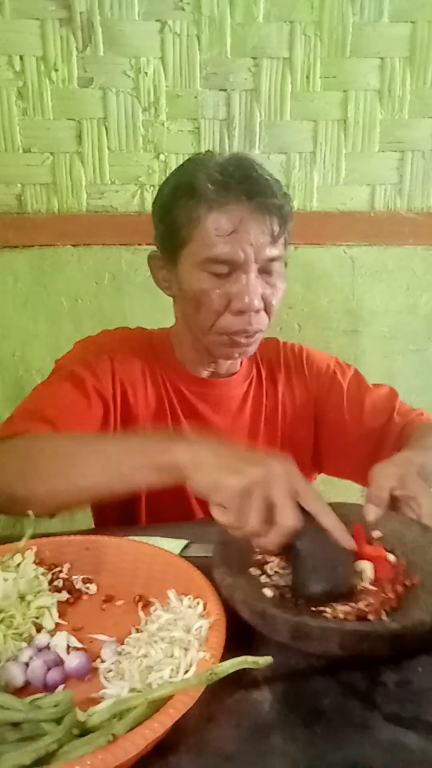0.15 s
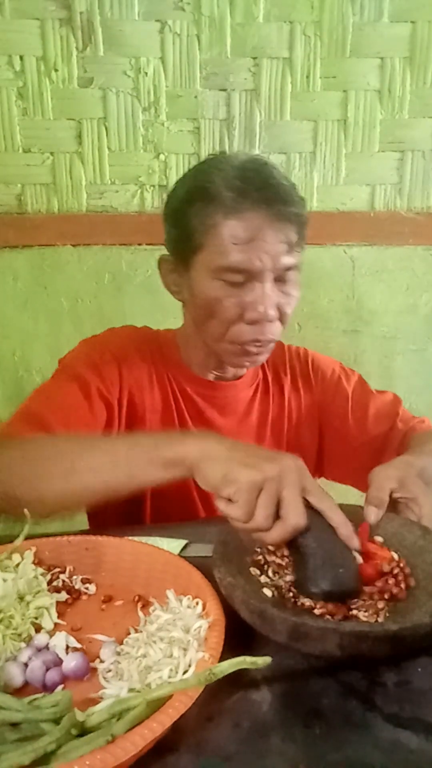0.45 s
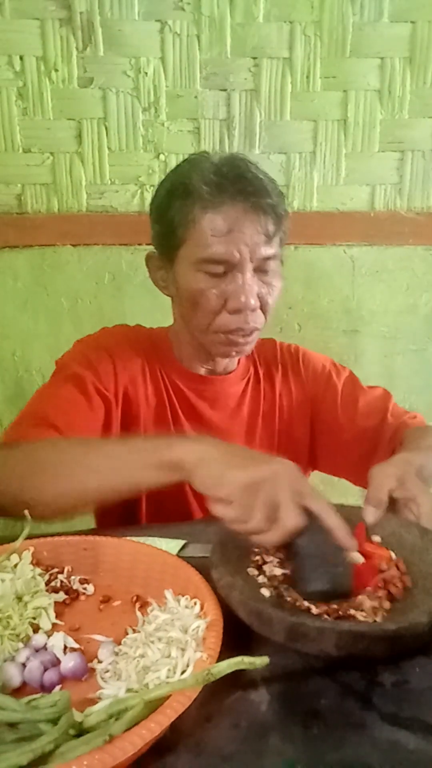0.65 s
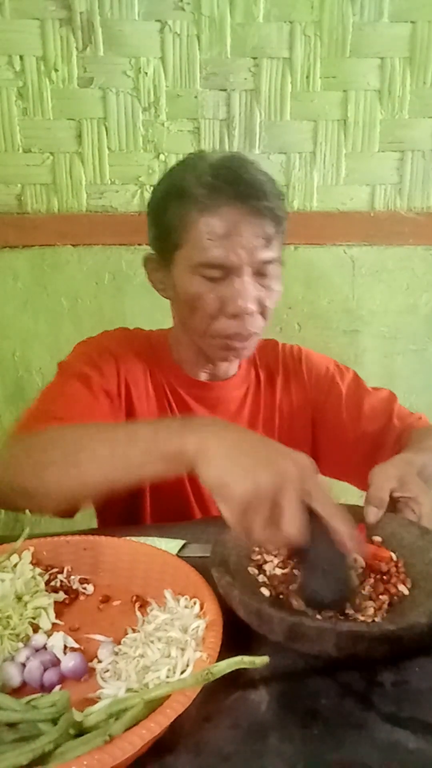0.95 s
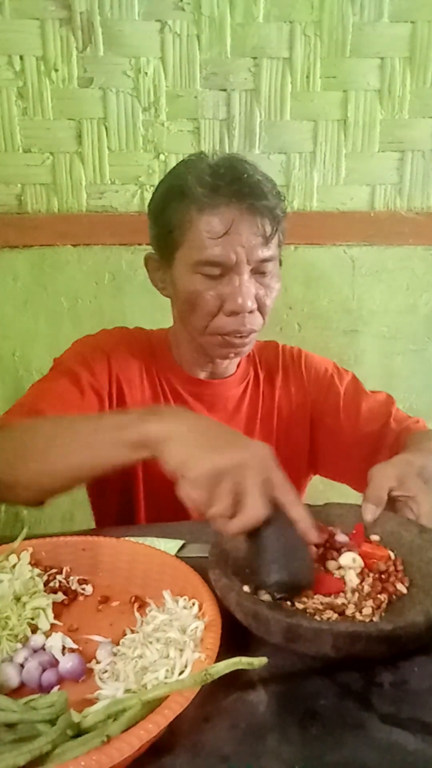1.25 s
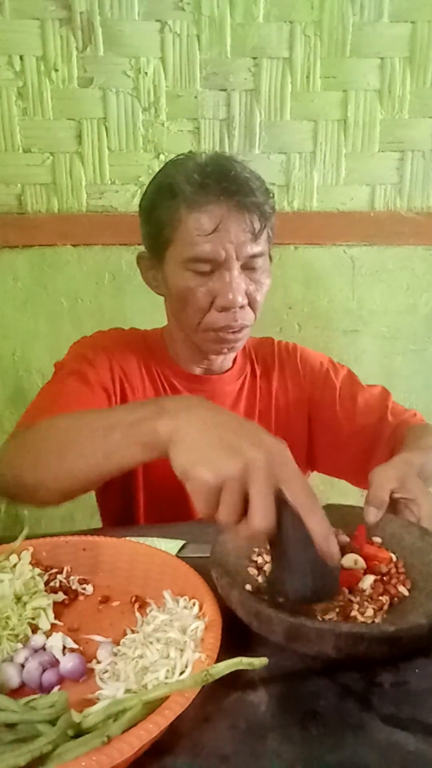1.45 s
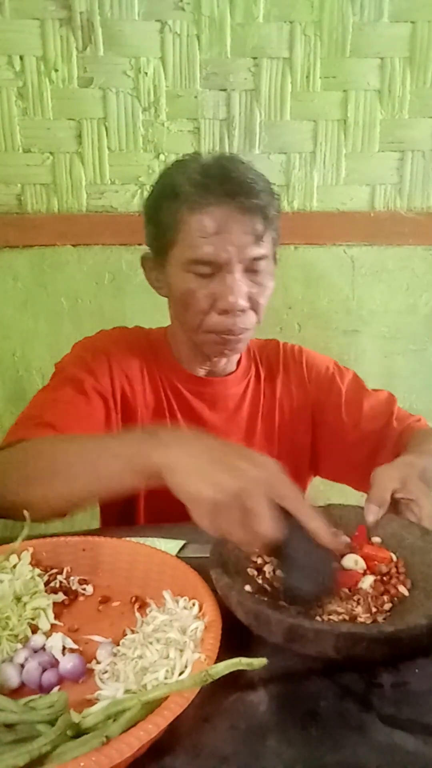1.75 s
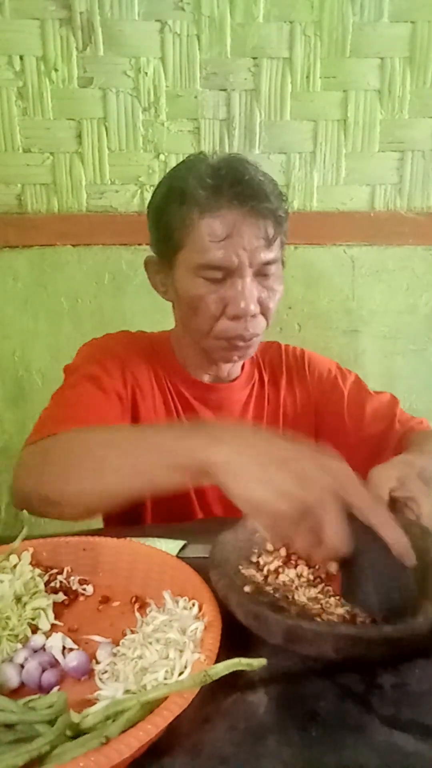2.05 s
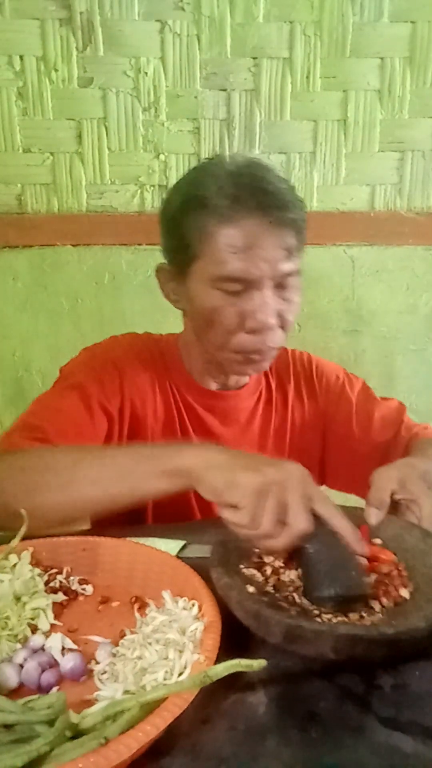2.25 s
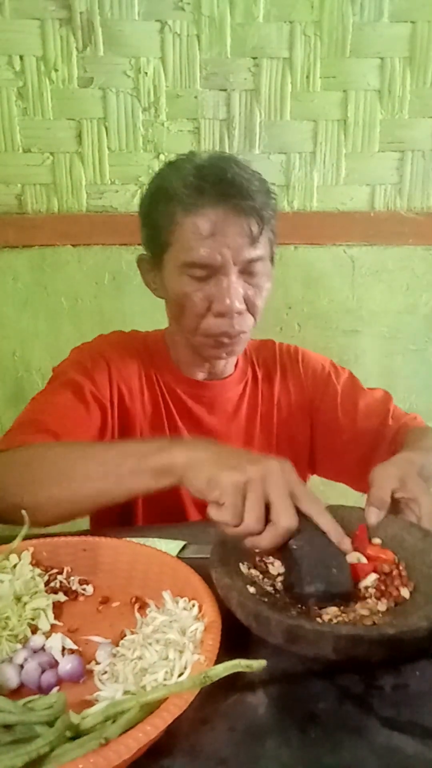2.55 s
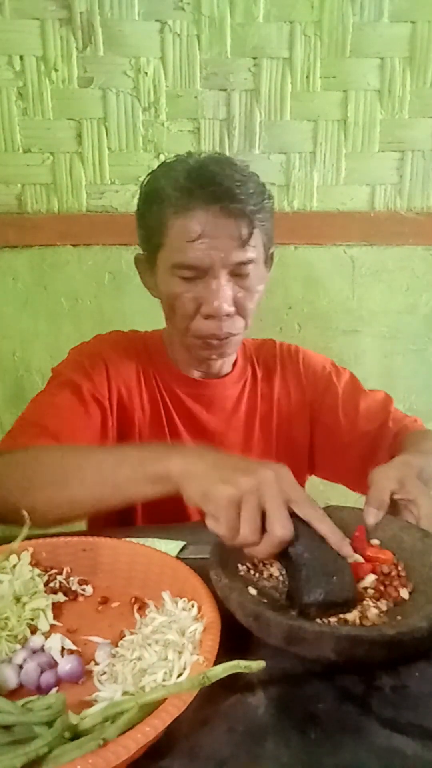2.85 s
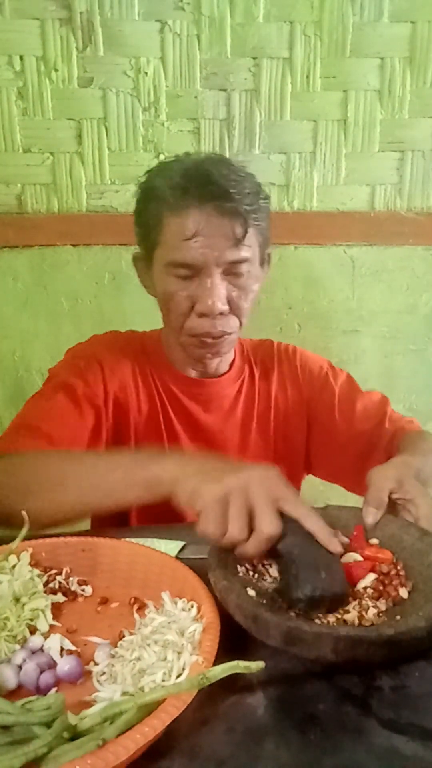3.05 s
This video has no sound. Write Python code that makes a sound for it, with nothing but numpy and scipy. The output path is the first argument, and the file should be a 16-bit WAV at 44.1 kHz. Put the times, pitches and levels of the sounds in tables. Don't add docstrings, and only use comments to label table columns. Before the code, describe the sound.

A stone pestle pounds and grinds dry nuts in a stone mortar, knocking and scraping quickly

```python
import sys
import numpy as np
from scipy import signal
from scipy.fft import rfft, irfft
from scipy.io import wavfile
from scipy.ndimage import uniform_filter1d

SR = 44100
rng = np.random.default_rng(int(sys.argv[2]) if len(sys.argv) > 2 else 0)


def digitize_waveform(pressure):
    field = np.atleast_2d(pressure).T
    bounded = np.clip(field, -1, 1)
    quanta = np.round(bounded * 32767).astype(np.int16)
    wavfile.write(sys.argv[1], SR, quanta)


def gain_from_decibels(decibels):
    exponent = np.asarray(decibels, float) / 20
    return 10 ** exponent


N = 141120
T = np.arange(N) / SR

# start_s, fade_s, thud_db, ring_db, crunch_db
KNOCKS = [(0.0857, 0.032, -49, -49, -54), (0.24, 0.01, -20, -40.5, -53.5),
          (0.3645, 0.024, -26.5, -27.5, -35), (0.371, 0.0072, -22.5, -28, -40),
          (0.5435, 0.0054, -44, -50, -27.5), (0.644, 0.008, -39, -40, -50), (0.959, 0.022, -26, -30.5, -37),
          (1.035, 0.0071, -33, -28, -44), (1.2048, 0.0056, -41.5, -90, -58.5),
          (1.3022, 0.01, -31, -40, -45.5), (1.343, 0.019, -33.5, -53, -45.5),
          (1.5581, 0.0064, -22.5, -21, -56), (1.6126, 0.014, -25, -26, -58),
          (1.8379, 0.011, -30, -26.5, -29.5), (1.9209, 0.037, -28.5, -34, -41),
          (2.0227, 0.0065, -48, -74, -32.5), (2.0478, 0.015, -21, -67, -64),
          (2.159, 0.01, -39, -18.5, -46.5), (2.3238, 0.013, -31, -57, -41.5),
          (2.4653, 0.0059, -41, -38.5, -42), (2.7777, 0.009, -19.5, -18.5, -41.5),
          (2.8265, 0.0079, -24.5, -22.5, -43), (2.9829, 0.017, -75, -42, -43.5),
          (3.1937, 0.012, -55, -31, -33)]
# start_s, ring_db, crunch_db
TICKS = [(0.096, -33, -49), (0.165, -34, -40), (0.4207, -55, -44), (0.444, -41, -49), (0.5144, -54, -49),
         (0.624, -78, -52), (0.7362, -43, -62), (0.744, -42, -52), (1.097, -77, -56), (1.1079, -78, -52),
         (1.6322, -31, -41), (1.638, -28.5, -42), (1.7105, -61, -43), (1.7245, -35.5, -34),
         (1.7385, -29.5, -26.5), (1.752, -32, -40), (1.962, -33.5, -45), (2.0797, -62, -52),
         (2.2238, -50, -48), (2.2407, -40, -48.5), (2.4753, -34.5, -53), (2.592, -70, -44.5),
         (2.8649, -25.5, -43), (3.013, -50, -49), (3.0535, -36, -46), (3.1482, -39.5, -63),
         (3.1713, -38.5, -35)]
# middle_s, half_width_s, thud_db, ring_db, crunch_db
STROKES = [(0.0, 0.025, -27.5, -42, -40.5), (0.108, 0.02, -27, -31, -40.5),
           (0.167, 0.024, -24.5, -32, -35.5), (0.272, 0.0086, -66, -45.5, -57.5),
           (0.401, 0.009, -41, -49, -63), (0.436, 0.023, -30.5, -35, -36.5),
           (0.494, 0.0062, -28.5, -74, -46.5), (0.543, 0.023, -35, -52, -37),
           (0.662, 0.03, -42.5, -51.5, -55), (0.707, 0.0084, -42.5, -57, -78),
           (0.75, 0.019, -30.5, -45, -45), (0.79, 0.028, -53, -59, -65.5),
           (0.85, 0.017, -54.5, -55, -59.5), (0.992, 0.026, -37.5, -67, -56),
           (1.036, 0.022, -50, -43.5, -44.5), (1.117, 0.017, -34.5, -72, -41.5),
           (1.218, 0.03, -41, -76, -71.5), (1.263, 0.015, -45, -46.5, -57),
           (1.33, 0.12, -44, -75, -64.5), (1.379, 0.021, -32.5, -46.5, -48.5),
           (1.42, 0.0092, -58, -59, -72), (1.581, 0.0091, -55, -29.5, -76),
           (1.638, 0.017, -27, -25.5, -32), (1.675, 0.015, -35.5, -48, -52),
           (1.741, 0.023, -21, -31.5, -36), (1.819, 0.023, -35.5, -74, -60),
                (1.873, 0.024, -60, -40.5, -51), (1.966, 0.015, -21.5, -58, -64),
                (2.012, 0.007, -27.5, -60, -79), (2.083, 0.01, -50, -39, -61),
                (2.129, 0.004, -65, -59, -65), (2.198, 0.018, -34.5, -31, -50),
                (2.237, 0.022, -32, -35.5, -45.5), (2.302, 0.04, -43.5, -48, -55.5),
                (2.344, 0.022, -44, -53.5, -67), (2.434, 0.034, -49, -75, -65),
                (2.483, 0.015, -41, -29.5, -46), (2.506, 0.012, -47, -38, -42),
                (2.568, 0.033, -31, -50.5, -50.5), (2.603, 0.019, -40, -77, -50.5),
                (2.685, 0.017, -57.5, -96, -95), (2.804, 0.012, -43, -29, -57),
                (2.873, 0.025, -20.5, -24, -32), (2.916, 0.018, -31.5, -62, -42),
                (2.963, 0.009, -45.5, -76, -61), (3.017, 0.0084, -40, -35, -56),
                (3.074, 0.028, -26.5, -34.5, -44), (3.162, 0.017, -37, -39, -46.5)]


def contact():
    power, snaps = np.zeros((3, N)), np.zeros((3, N))
    rise_s, snap_db, tick_fade_s = 0.0001, 7, 0.0062
    stroke_tail = 1.234
    ticks = [(start, tick_fade_s, -90, ring_db, crunch_db) for start, ring_db, crunch_db in TICKS]
    for start, fade, *levels_db in KNOCKS + ticks:
        levels_db = np.array(levels_db)
        since = np.maximum(T - start, 0)
        softness = 100 * fade
        rise = 1 - np.exp(-since / (rise_s * softness ** 2))
        power += gain_from_decibels(levels_db)[:, None] ** 2 * rise ** 2 * np.exp(-2 * since / fade)
        snaps[:, int(start * SR)] = gain_from_decibels(levels_db + snap_db) * np.sqrt(SR / 1000) / softness
    for middle, half_width, *levels_db in STROKES:
        away = (T - middle) / half_width / np.where(T > middle, stroke_tail, 1)
        power += gain_from_decibels(np.array(levels_db))[:, None] ** 2 * np.exp(-2 * away ** 2)
    return np.sqrt(power), snaps


def grit(spread_db):
    grains_per_s, lumps_per_s, lump_db = 6900, 104, 1
    sizes = gain_from_decibels(spread_db * np.minimum(rng.exponential(1, N), 5)) * rng.choice([-1, 1], N)
    happens = rng.random(N) < grains_per_s / SR
    return rms_one(sizes * happens * gain_from_decibels(lump_db * drift(lumps_per_s)))


# pitch_hz, level_db, t60_s
BOWL = [(162.6, -12, 0.19), (204.8, -7.5, 0.066), (259.1, -5.5, 0.078), (316.8, -9, 0.16),
        (400.2, 1, 0.058), (445.3, 0, 0.039), (502, -5.5, 0.026)]


def bowl_thud(thud):
    bowl = butter(gain_from_decibels(-1.5) * body(thud, BOWL), [110, 900], "band")
    shake = gain_from_decibels(-0.5) * butter(thud, [82, 159], "band")
    return bowl + shake


# pitch_hz, level_db, t60_s
STONE = [(1710, -8, .035), (2075, -1, .045), (2130, -2, .04), (2190, -5, .03), (2460, -13, .02)]
# pitch_hz, level_db, t60_s
STONE_CLEAR = [(3530, -18, .03), (4450, -16, .02), (4525, -9, .035), (4620, -16, .02), (7110, -21, .02),
               (9900, -26, .018), (12900, -28, .012)]
# pitch_hz, level_db, t60_s
STONE_HIGH = [(5190, 8.5, 0.02), (5295, 5, 0.015), (5300, 11.5, 0.025), (5900, -2, 0.011),
              (7457, 6.5, 0.016), (9700, -5.5, 0.033), (10500, -2, 0.018), (11180, -3.5, 0.021),
              (14100, -10, 0.011), (13740, 5.5, .015)]


def stone_ring(stone, bare, loose):
    deep = gain_from_decibels(-1.5) * body(stone * np.minimum(0.4 + 4.2 * bare, 1), STONE)
    return butter(deep, [500, 6000], "band") + body(stone * loose ** 2, STONE_CLEAR)


def stone_high_ring(crunch, bare, loose):
    ringing = body(crunch * np.sqrt(bare) * (1 - 0.79 * loose), STONE_HIGH)
    return gain_from_decibels(-11.5) * butter(ringing, 2040, "high")


# pitch_hz, level_db, t60_s
PESTLE = [(834, 1, 0.0038), (896, -5.5, 0.051), (1092, -4, 0.017), (1393, -0.5, 0.014), (1834, 0, 0.0031),
          (2916, -5.5, 0.0026), (5010, -28, 0.015)]


def pestle_body(thud, stone, crunch, bare, force):
    ring_share = force[1] ** 2 / (force ** 2).sum(axis=0).clip(1e-12)
    drive = gain_from_decibels(-17.5) * butter(thud, 2180, "low")
    drive = drive + gain_from_decibels(-4.5) * stone * (1.2 - bare) * (1 - 0.18 * ring_share)
    drive = drive + gain_from_decibels(-12.5) * crunch
    return butter(body(drive, PESTLE), [500, 6000], "band")


# pitch_hz, level_db (per Hz)
CRUNCH = [(350, -16), (600, 2.5), (1490, -27), (1690, 3), (3390, -4), (5310, -4), (8430, -12.5),
          (13400, -5), (15600, -3.5)]


def nut_crunch(crunch, bare):
    return coloured(crunch * (1 - bare) ** 1.6, CRUNCH, from_hz=8000)


# time_s, brightness_db
DRYNESS = [(0, 4), (.07, -3), (.22, -8.5), (.36, 5), (.75, 1.5), (.96, 7), (1.07, -9.5), (1.12, 2),
           (1.2, -18), (1.26, 0), (1.36, 6.5), (1.56, 0), (1.93, 0), (2.06, -9), (2.2, -4), (2.6, 2.5),
           (2.9, -7.5), (3.2, -3)]


def dryness_tilt(x):
    dry = gain_from_decibels(np.interp(T, *np.transpose(DRYNESS)))
    return butter(x, 7300, "low") / dry - butter(x, 7300, "high") * dry ** 0.48


# middle_s, half_width_s, level_db, pitch_hz
JUDDERS = [(0.168, 0.01, -13, 445), (0.243, 0.0078, -22, 432), (0.747, .01, -23.5, 420),
           (1.38, 0.014, -19.5, 422.6), (1.567, 0.01, -21, 409), (1.746, 0.0094, -14.5, 406.4),
           (2.015, 0.0049, -19.5, 400), (2.051, 0.0082, -15, 408.5), (2.233, 0.018, -24, 429.5),
           (2.884, 0.017, -23.5, 442.4), (3.081, 0.026, -25.5, 415)]


def judder():
    waver, rise_over_fall = 0.03052, 0.54
    out, warped_s = 0, np.cumsum(1 + waver * drift(31)) / SR
    for middle, half_width, db, hz in JUDDERS:
        away = (T - middle) / half_width / np.where(T < middle, rise_over_fall, 1)
        out = out + gain_from_decibels(db) * np.exp(-away ** 2) * np.sin(2 * np.pi * hz * warped_s)
    return out


# start_s, end_s, ringing_share (of the crunch, 0-1)
BARE = [
    (0.085, 0.305, 0.3),
    (0.822, .9, 0.13),
    (1.246, 1.33, 0.56),
    (1.546, 1.91, 0.63),
    (2.15, 2.23, 0.38),
    (2.44, 2.528, 0.99),
    (2.74, 3.217, 0.64),
]
# start_s, end_s, loose_share (0-1)
LOOSE = [
    (1.55, 1.608, 0.52),
    (1.608, 1.91, 0.59),
    (2.44, 2.53, 1),
    (2.77, 2.858, 0.72),
    (2.858, 2.97, 0.69),
    (2.97, 3.04, 0.34),
    (3.04, 3.21, 0.4),
]


def mortar():
    force, snaps = contact()
    bare, loose = spans(BARE, least=0.044), spans(LOOSE, least=0.34)
    thud = force[0] * grit(spread_db=3.0) + snaps[0]
    stone = force[1] * grit(spread_db=2.5) + snaps[1]
    crunch = force[2] * grit(spread_db=3.0) + 0.3 * snaps[2]
    low = bowl_thud(thud)
    mid = stone_ring(stone, bare, loose) + pestle_body(thud, stone, crunch, bare, force)
    top = dryness_tilt(nut_crunch(crunch, bare) + stone_high_ring(crunch, bare, loose))
    return low + mid + top + judder()


def walls(x):
    t60_s, cut_hz = 0.11, 34000
    out, dull = np.zeros(N), np.exp(-2 * np.pi * cut_hz / SR)
    lags = (rng.uniform(0.0062, 0.024, 8) * SR).astype(int)
    for k, lag in enumerate(lags):
        loop, state = x.copy(), [0.]
        gain = gain_from_decibels(-60 * lag / SR / t60_s)
        for i in range(lag, N, lag):
            back, state = signal.lfilter([gain * (1 - dull)], [1, -dull], loop[i - lag:i], zi=state)
            loop[i:i + lag] += back[:N - i]
        out += (loop - x) * (-1) ** k
    return out


# pitch_hz, level_db (per Hz)
ROOM = [(20, 28), (45, -4.5), (170, 2), (800, -17.5), (6000, -30.5), (15600, -57)]


def room_tone():
    air = gain_from_decibels(-45.5) * coloured(rng.standard_normal(N), ROOM)
    hum = gain_from_decibels(-53.5) * rms_one(ring(rng.standard_normal(N), hz=157, t60=0.3))
    return hum + air * gain_from_decibels(3.5 * drift(4.7))


def rms_one(x):
    return x / np.sqrt(np.mean(x ** 2) + 1e-20)


def ring(x, hz, t60):
    r, w = gain_from_decibels(-60 / (t60 * SR)), 2 * np.pi * hz / SR
    return signal.lfilter([0, np.sin(w)], [1, -2 * r * np.cos(w), r * r], x + 1e-18)


def body(x, modes):
    click, out = np.zeros(SR // 4), 0
    click[0] = 1
    wander = drift(14)
    for k, (hz, db, t60) in enumerate(modes):
        gain = (-1) ** k * gain_from_decibels(db) / np.sqrt(np.sum(ring(click, hz, t60) ** 2))
        place = gain_from_decibels(3.5 * np.roll(wander, rng.integers(N)))
        out = out + gain * ring(x * place, hz, t60)
    return out


def coloured(x, spectrum, from_hz=20):
    hz = np.maximum(np.arange(N // 2 + 1) * SR / N, 1)
    point_hz, point_db = np.transpose(spectrum)
    gain = gain_from_decibels(np.interp(np.log(hz), np.log(point_hz), point_db, left=-90, right=-90))
    return irfft(rfft(x) * gain / np.sqrt(np.mean((gain * (hz > from_hz)) ** 2)), N)


def butter(x, hz, kind):
    return signal.sosfilt(signal.butter(2, hz, kind, fs=SR, output="sos"), x)


def drift(rate):
    r = np.exp(-2 * np.pi * rate / SR)
    slow = signal.lfilter([1], [1, -2 * r, r * r], rng.standard_normal(N + SR))
    return rms_one(slow[SR:])


def spans(rows, least):
    share = np.full(N, least)
    for start, end, value in rows:
        share[(T > start) & (T < end)] = value
    return np.clip(uniform_filter1d(share, size=600), 0, 1)


def scene():
    near = mortar()
    return (near + gain_from_decibels(-17.5) * walls(near) + room_tone())[None]


def roll_off(x):
    return signal.sosfilt(signal.butter(12, 15720, fs=SR, output="sos"), x)


def record(dry):
    rounded = 0.61 * np.tanh(dry / 0.6)
    thin = butter(rounded, 94.7, "high")
    top_cut = signal.cheby2(10, 60, 15960, fs=SR, output="sos")
    return roll_off(signal.sosfilt(top_cut, thin))


dry = scene()
out = record(dry)
digitize_waveform(out)
```